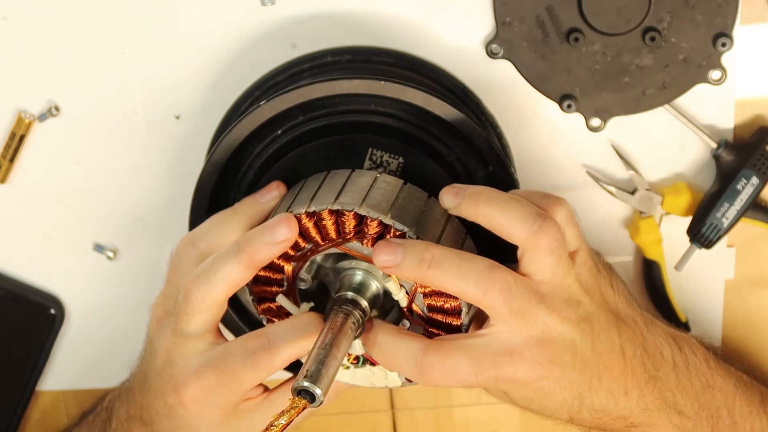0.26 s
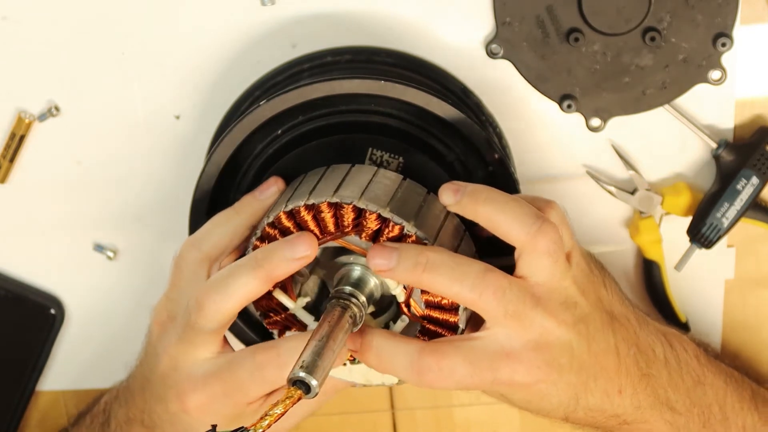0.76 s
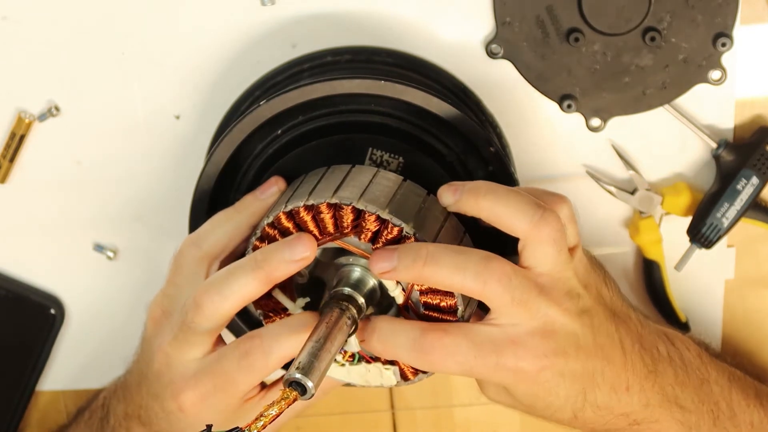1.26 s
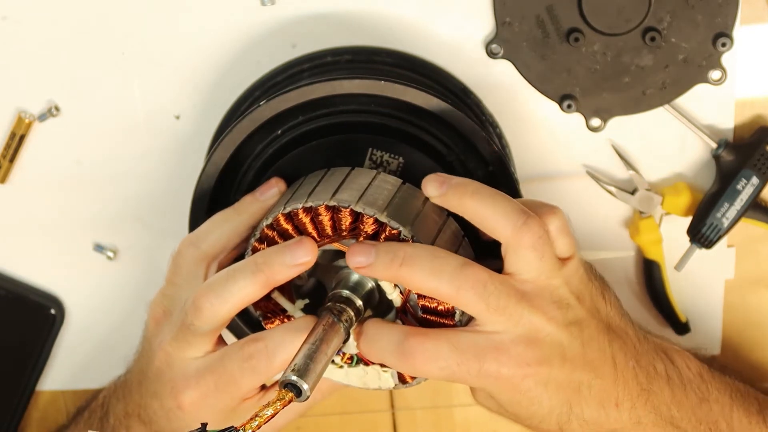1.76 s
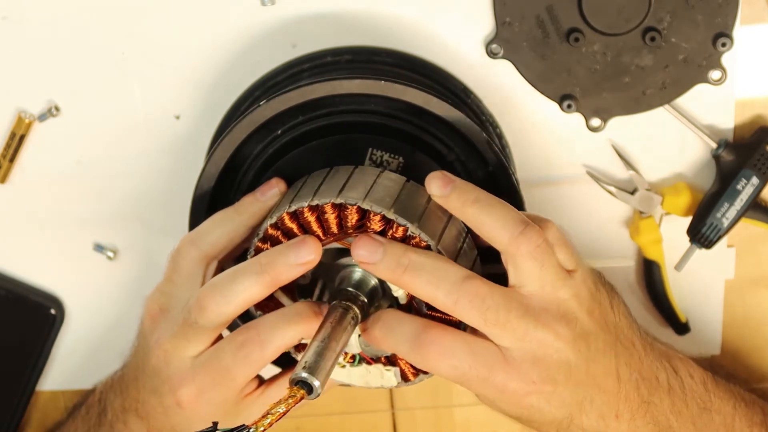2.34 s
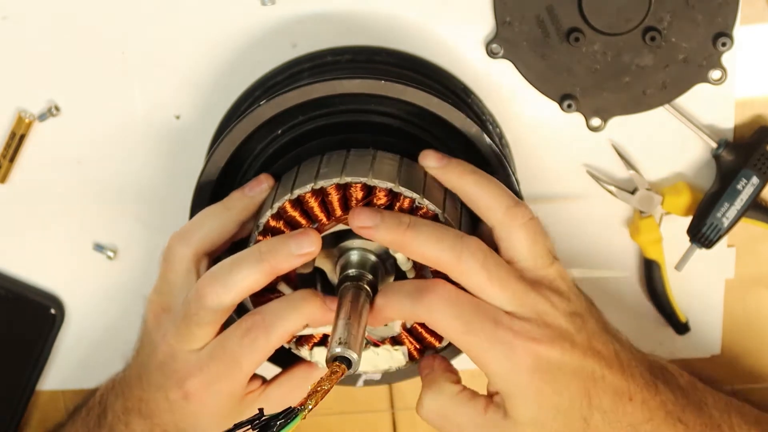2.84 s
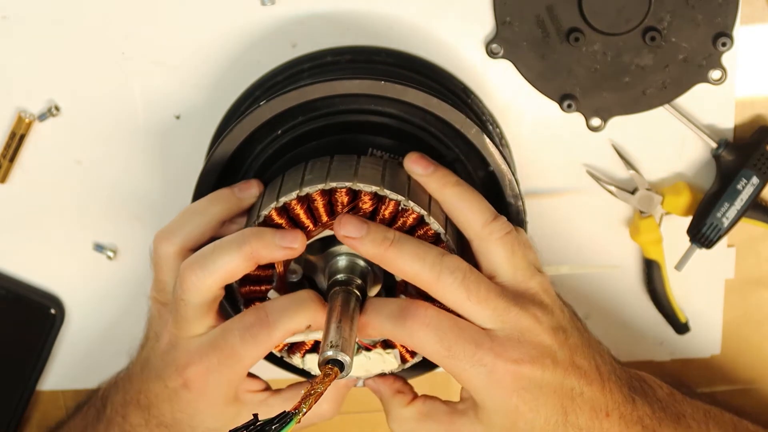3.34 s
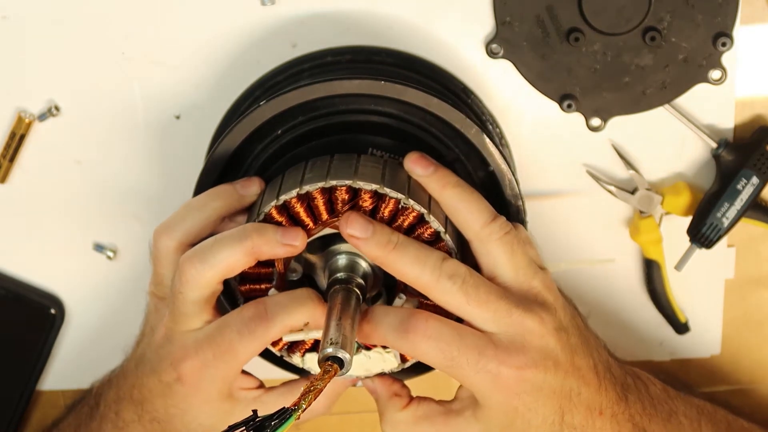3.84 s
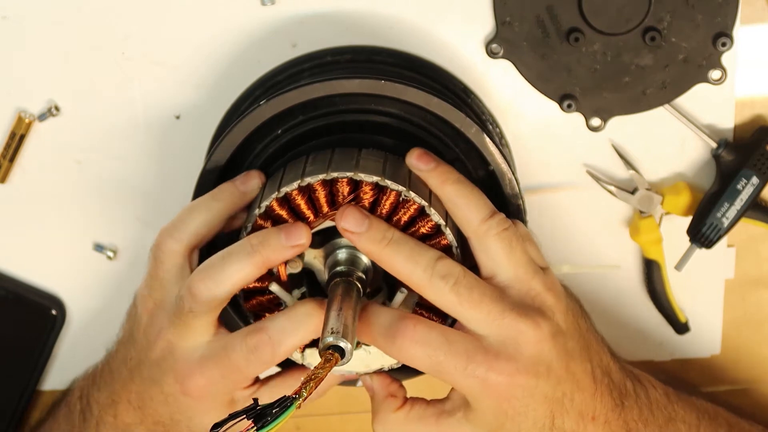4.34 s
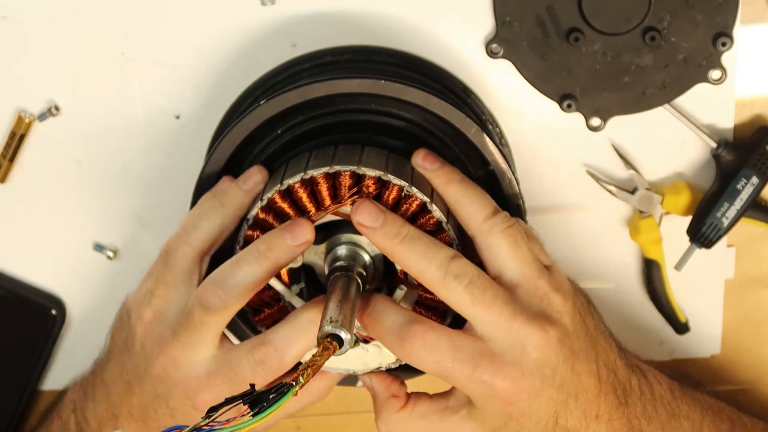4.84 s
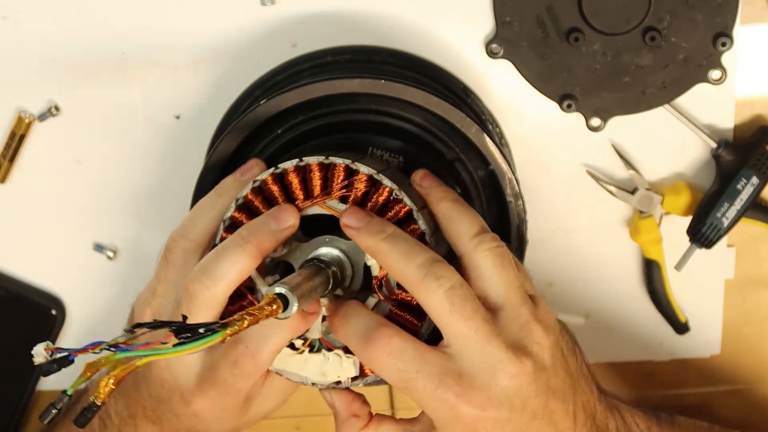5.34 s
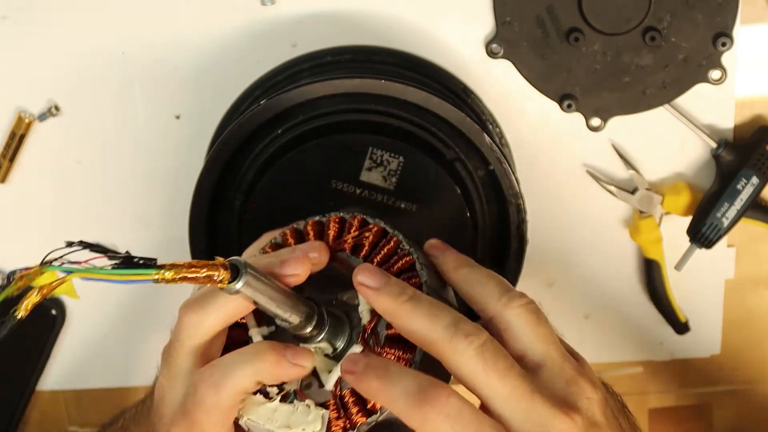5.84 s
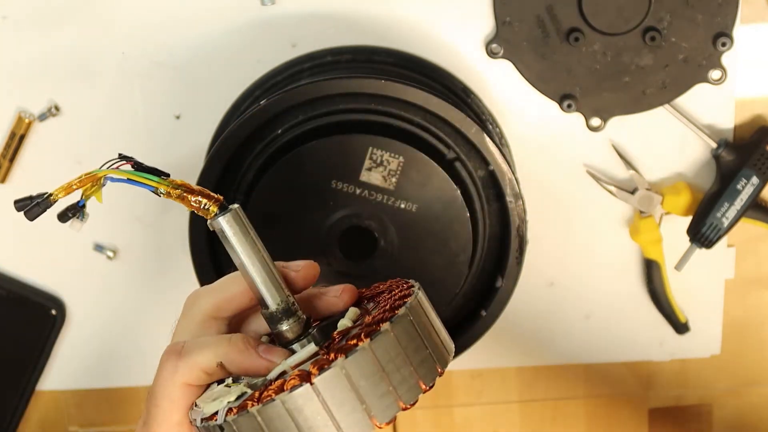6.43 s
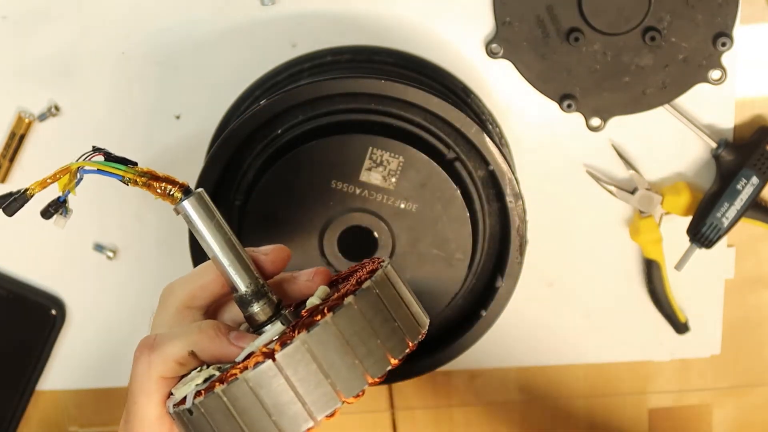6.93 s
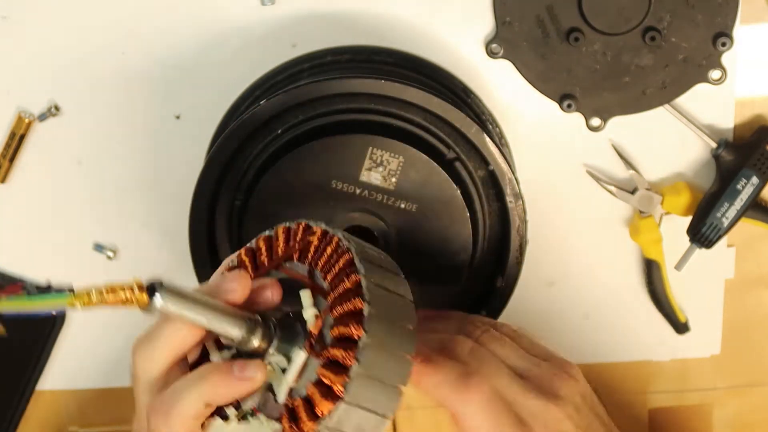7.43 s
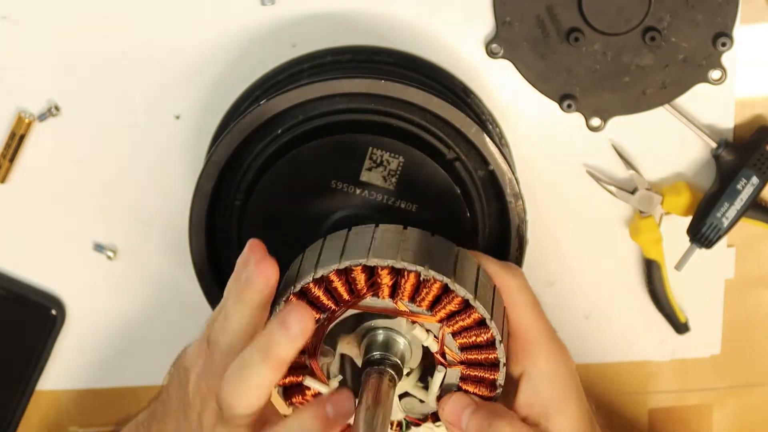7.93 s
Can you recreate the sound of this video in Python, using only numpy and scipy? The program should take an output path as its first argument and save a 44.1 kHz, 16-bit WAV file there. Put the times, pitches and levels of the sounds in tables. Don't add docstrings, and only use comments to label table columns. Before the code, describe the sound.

Close above a hollow workbench, hands work a heavy metal motor core loose. Light clicks and a dull knock come first, then one loud clunk with a brief metallic ring and chatter. Softer thuds and a set-down follow, then connectors clatter with a bright cable rustle. Faint steel tinks end it, over steady ventilation hum and hiss.

```python
import sys
import numpy as np
from scipy import signal
from scipy.fft import rfft, irfft, next_fast_len
from scipy.io import wavfile

SR = 44100
rng = np.random.default_rng(int(sys.argv[2]) if len(sys.argv) > 2 else 0)


def field_ratio(decibels):
    return 10 ** (np.asarray(decibels, dtype=float) / 20)


def dump_mix(stems):
    frames = np.atleast_2d(stems).T
    limited = np.clip(frames, -1, 1)
    pcm = np.round(limited * 32767).astype(np.int16)
    wavfile.write(sys.argv[1], SR, pcm)


N = 360738


def rms_one(x):
    return x / np.sqrt(np.mean(x ** 2) + 1e-20)


def row_norm(x):
    return np.linalg.norm(x, axis=1, keepdims=True)


def at_hz(points, hz):
    table_hz, value = np.array(points).T
    return np.interp(np.log(np.maximum(hz, 1)), np.log(table_hz), value)


def in_time(rows):
    s, db = np.transpose(rows)
    return field_ratio(np.interp(np.arange(N) / SR, s, db, left=-200, right=-200))


def swells(rows, rest_db=-200):
    t = np.arange(0, N + 32, 32) / SR
    slow = field_ratio(rest_db) + sum(field_ratio(db) * np.exp(-((t - s) / half_s) ** 2) for s, db, half_s in rows)
    return np.interp(np.arange(N) / SR, t, slow)


def add(track, s, sound):
    at = round(s * SR)
    track[at:at + len(sound)] += sound[:N - at]


def resonance(x, hz, width_hz):
    r = np.exp(-np.pi * width_hz / SR)
    poles = [1, -2 * r * np.cos(2 * np.pi * hz / SR), r * r]
    return signal.lfilter([(1 - r * r) / 2, 0, (r * r - 1) / 2], poles, x)


def soften(x, contact_ms):
    r = np.exp(-2000 / SR / max(contact_ms, .01))
    return signal.lfilter([(1 - r) ** 2], [1, -2 * r, r * r], x)


def struck(modes, extra_db, ring, rise_ms, spread_db, seconds, sign_bias=.5):
    hz, db, t60 = np.transpose(modes)[:, :, None]
    t = np.arange(int(seconds * SR)) / SR
    strength, side = rng.standard_normal((2, len(modes), 1))
    start = field_ratio(db + extra_db(hz) + spread_db * strength) * np.where(side > -sign_bias, 1, -1)
    decay = field_ratio(-60 * t / (t60 * max(ring, .1)))
    rings = np.sum(start * decay * np.sin(2 * np.pi * hz * t), axis=0)
    return rings * (1 - np.exp(-1000 * t / max(rise_ms, .02)))


def touched(touches, modes, rise_ms):
    out = np.zeros(N)
    for s, db, upper_db, tilt_db, ring in touches:
        def reach(hz):
            treble_db = tilt_db * np.log2(np.maximum(hz / 5000, 1))
            return upper_db * (hz > 1.55 * modes[0][0]) + treble_db
        sound = struck(modes, reach, ring, rise_ms, spread_db=0.9, seconds=0.22)
        add(out, s, field_ratio(db) * sound / np.abs(sound).max())
    return out


# start in s, peak in dB, low modes in dB, middle modes
# in dB, contact in ms.
KNOCKS = [(0.698, -34, 1, 9.5, 0.51), (0.987, -17.5, -2, 3.5, 0.8), (2.621, -22.5, -2, 3, 0.53),
          (2.66, -25.5, -12, 2, 0.3), (2.7045, -13, -3, -5, 0.6), (2.6988, -1, -1.5, 2, 0.57),
          (2.719, -7.5, -13, -18, 0.36), (2.7395, -16, -7, -16, 0.54), (2.762, -17, 8.5, 11, 0.92),
          (2.845, -22, -4, -14, 0.52), (3.31, -20, -8, 8, 1.3), (4.264, -24, -3, 7.5, 1.6),
          (4.405, -31.5, 5.5, 6.5, 1.1), (4.8165, -27, -14, -13, 0.84), (4.829, -27.5, -9, 3, 3.1),
          (4.87, -34, 7, -1, 0.48), (4.948, -24.5, -13, 30, 3), (4.963, -25, -8, 3, 0.41),
          (0.671, -32, 4, 7, 0.37), (0.714, -31, -6, 3, 0.98), (1.72, -46, -17, -2, 0.47),
          (2.198, -48, 15, -4, .7), (2.969, -40, 0, 5, 0.91), (3.091, -42, -14, -7, 0.58),
          (3.352, -31, 1, 8, 0.73), (3.733, -35, 3, -0.5, 0.52), (3.829, -36.5, 9, -6, 0.61),
          (4.058, -39.5, 3, 3, 0.39), (4.099, -37.5, 1, -1, 0.6), (4.55, -42, -5, 4, 0.61),
          (4.691, -36.5, 10, 8, 0.78), (4.893, -38, 6, 0, .6), (4.94, -35, 8, -2, .4),
          (5.059, -40, -2, 3, 0.91), (5.261, -36.5, 2.5, 3, 0.32), (5.381, -44, 1, 1, 0.37)]
MORE_KNOCKS = [
    (0.743, -39, 0, 8, 0.71),
    (0.7, -43, 0, 10, 0.92),
    (1.004, -31.5, -21, -15, .4),
    (3.313, -30, -22, -15, 0.92),
    (3.115, -41, -13, -12, 0.62),
    (2.7, -16, 11, -15, 1.4),
]
# frequency in Hz, level in dB, t60 in s.
BENCH = [(64.4, -7, 0.23), (116.4, -3, 0.3), (147.7, -7, 0.37), (210.5, -13, 0.28), (227.2, -5, 0.21),
         (270, -20, 0.17), (313, -5, 0.25), (363.2, -3, 0.22), (413.5, -6.5, 0.19), (453, -7, 0.24),
         (519.5, -12, 0.38), (566.4, -10.5, 0.21), (601, -13, 0.13), (692, -19, 0.23), (739.6, -22, 0.6),
         (783, -15.5, 0.09), (862, -30, 0.46), (960, -30, 0.23), (1058, -13.5, 0.06)]
# centre in s, level in dB, half length in s.
DRAG = [
    (0.5, -55.5, 0.49),
    (1.72, -55, 0.091),
    (2.3, -54.5, 0.87),
    (2.85, -36, 0.19),
    (3.4, -53, 0.26),
    (4.36, -44, 0.18),
    (4.92, -32.5, 0.09),
    (6.7, -60.5, 1),
]


def bench():
    out = np.zeros(N)
    for s, db, low_db, middle_db, contact_ms in sorted(KNOCKS) + MORE_KNOCKS:
        def place(hz):
            return np.where(hz < 170, low_db, middle_db * (hz < 290))
        ring = 0.42 + 0.0055 * db
        boom = struck(BENCH, place, ring, rise_ms=2.5, spread_db=3.5, seconds=.35, sign_bias=10)
        boom = signal.lfilter(*signal.butter(2, 60, "high", fs=SR), soften(boom, contact_ms))
        add(out, s, field_ratio(db) * boom / np.abs(boom).max())
    slips_per_s = 400
    slips = rng.standard_normal(N) * (rng.random(N) < slips_per_s / SR)
    slips = soften(slips, contact_ms=1.2)
    drag = sum(field_ratio(db) * resonance(slips, hz, 5.5 / t60) for hz, db, t60 in BENCH)
    return out + field_ratio(-9.0) * swells(DRAG, rest_db=-51.5) * rms_one(drag)


# frequency in Hz, level in dB, t60 in s.
HOUSING = [(972, -3, 0.21), (1130, -4, 0.059), (1590, 2.5, 0.033), (1737, 4, 0.046), (1940, 9, 0.016),
           (2314, 9, 0.031), (2340, -12, 0.098), (2530, -1, 0.078), (2405, -6, 0.24), (2800, -7.5, 0.19),
           (2770, -12, 0.1), (3144, -3, 0.1), (3970, -34, 0.18), (4300, -21, 0.14), (4130, -21, 0.16),
           (4700, -20.5, 0.14), (3080, 21, 0.018), (3110, -12, 0.17), (3020, -24, 0.26), (3750, -23, 0.091),
           (2640, -12, 0.2), (3330, -27, 0.2), (3500, -19, 0.035), (4500, -17, 0.11)]


def housing():
    blow = touched([(2.6975, -8.5, 0, 0, 1)], HOUSING, rise_ms=0.77)
    chatter_db, chatter_t60_s, contacts_per_s = -29, 0.62, 900
    t = np.arange(SR // 2) / SR
    contacts = rng.standard_normal(len(t)) * (rng.random(len(t)) < contacts_per_s / SR)
    chatter = contacts * field_ratio(chatter_db - 60 * t / chatter_t60_s)
    return blow + signal.oaconvolve(blow, chatter)[:N]


# start in s, peak in dB, upper modes in dB, treble in dB per octave, ring time factor.
CLINKS = [(.9872, -37, 3, -23, 0.62), (1.7243, -45, 11, 6, 0.6), (2.619, -44.5, -9, -8, 0.43),
          (2.691, -41, -4, -10, 0.39), (2.709, -29, 0, -1, 0.65), (2.737, -30, 0, -18, 0.3),
          (3.057, -45, 1, -17, 0.35), (3.35, -57, -13, -8, 0.37), (3.445, -57, -10, -8, 0.54),
          (3.12, -61, 23, -4, .7), (3.308, -55, -16, -4, 0.66), (3.83, -53, -8, -6, 0.84),
          (4.55, -58, 10, -4, 0.59), (4.8175, -32.5, 2, 13.5, 0.22), (4.826, -38.5, 28, 3, 0.77),
          (4.908, -50, 20, -10, 0.3)]
# frequency in Hz, level in dB, t60 in s.
CORE = [(2445, 10.5, 0.11), (2425, -6, 0.25), (4215, -5, 0.11), (4170, -4, 0.17), (4330, -16, .1),
        (2340, -14, .04), (2560, -12, .04), (4520, -11, 0.07), (4610, -18, 0.085), (7330, -10, 0.095),
        (10040, -14, .04), (10600, -19, .06), (12700, -23, 0.06)]


def core():
    return touched(CLINKS, CORE, rise_ms=.6)


# centre in s, level in dB, half length in s.
BUZZ_LOW = [
    (1.062, -58.5, .045),
    (1.145, -64, 0.018),
    (1.744, -65, .02),
    (2.664, -63, 0.037),
    (2.92, -50, 0.018),
    (4.885, -62, .02),
    (4.935, -64, .015),
    (5.024, -60, 0.025),
]
# centre in s, level in dB, half length in s.
BUZZ_HIGH = [
    (1.02, -64, 0.017),
    (2.68, -61, .012),
    (2.74, -48, 0.02),
    (2.81, -60, 0.018),
    (2.92, -66, .015),
    (4.89, -63, .01),
    (4.975, -64, .015),
    (5.04, -70, .015),
]
# frequency in Hz, width in Hz.
BUZZ_RINGS = [(2440, 100), (4190, 90)]


def buzz():
    contacts_per_s = 500
    contacts = rng.standard_normal((2, N)) * (rng.random((2, N)) < contacts_per_s / SR)
    out = np.zeros(N)
    for rows, grains, (hz, width_hz) in zip((BUZZ_LOW, BUZZ_HIGH), contacts, BUZZ_RINGS):
        ring = resonance(resonance(grains, hz, width_hz), hz, 4 * width_hz)
        out += swells(rows) * rms_one(ring)
    return out


# start in s, peak in dB, upper modes in dB, treble in dB per octave, ring time factor.
TINKS = [
    (2.155, -59, -2, 4, .8),
    (3.735, -61, 17, -14, 0.56),
    (3.821, -53, 8, -12, 0.67),
    (7.6574, -47, 2, 7, 0.9),
    (7.69, -47.5, -3, -3, 1.14),
    (8.07, -54, -39, 35, 0.47),
]
# frequency in Hz, level in dB, t60 in s.
SHAFT = [(4100, -13, 0.089), (4260, -8, 0.2), (4340, -6, .2), (5432, -13, .2), (6230, -7, 0.16),
         (7950, -5.5, 0.27), (10220, -4, 0.14), (12980, -12, .2)]


def shaft():
    return touched(TINKS, SHAFT, rise_ms=.2)


# start in s, peak in dB, upper modes in dB, treble in dB per octave, ring time factor.
PLUG_TAPS = [
    (6.8229, -23.5, -7, 6, 1),
    (6.8623, -20.5, -11, 12, 0.64),
    (6.9462, -16, 10, -2, 0.57),
    (6.975, -20.5, 9, -4, 1),
]
# frequency in Hz, level in dB, t60 in s.
PLUG = [(3690, 3.5, 0.019), (6020, -10, 0.023), (9000, -21, 0.0066), (10280, 1, 0.013), (13050, 6, 0.007),
        (15430, -2, 0.0093), (1860, -0.5, 0.071), (2500, -3, .03), (4340, -11, .02), (410, -14, 0.086),
        (586, -9, 0.037)]


def plug_shells():
    return touched(PLUG_TAPS, PLUG, rise_ms=0.36)


# start
# in s, peak in dB, main resonance in Hz, crack in dB, contact in ms.
CLICKS = [(0.668, -23, 2540, 3, 0.059), (0.7014, -29, 3170, 0, 0.067), (0.951, -34, 3500, 2, 0.09),
          (4.258, -32, 3030, 29, 0.05), (5.799, -27, 1390, 11, 0.13), (6.7985, -22, 1140, 0, 0.055),
          (6.824, -25, 1940, 4, 0.05), (6.863, -25, 1860, 0.5, 0.098), (6.9477, -22, 1860, -4, 0.018),
          (6.9759, -22, 1860, -8, 0.022), (7.0166, -15.5, 3270, 8, 0.081), (7.0934, -23.5, 2650, 3, 0.18),
          (6.829, -26, 1140, 0, 0.065), (6.8758, -29, 1860, 3, 0.038), (6.982, -25.5, 1770, -6, 0.046),
          (7.0225, -43, 3220, 7, .06), (0.7098, -37, 2670, 2, .06), (2.699, -22.5, 1920, 37, 1),
          (7.093, -26, 11460, -12, 0.014), (6.8056, -34, 1140, 6, 0.057), (6.811, -35, 1160, -7, 0.044),
          (6.8356, -30, 2730, -3, .05), (6.849, -35, 1350, -4, .05), (6.868, -34, 1930, -1, .05),
          (6.9518, -30.5, 1860, -12, .04), (6.9895, -33, 3600, -4, .05), (6.8655, -26.5, 1840, -8, 0.076),
          (5.8055, -40, 1350, 1, 0.085), (5.812, -40, 1310, -5, 0.12), (4.266, -40, 2700, -3, .06),
          (7.001, -38, 1800, 3, 0.045), (7.029, -34, 1230, 0, 0.063), (7.054, -35, 2000, -2, 0.066),
          (7.099, -37, 2430, -3, .08), (7.105, -36, 1250, 4, 0.1)]
# start in s, peak in dB, main resonance in Hz, crack in dB.
TICKS = [(0.1307, -45.5, 6600, 8), (.597, -51, 7250, 6), (0.63, -52, 3870, -10), (0.658, -41.5, 6200, -24),
         (1.83, -57, 11000, 15), (2.0905, -46.5, 3580, 4), (2.205, -55, 6800, -2), (2.594, -44.5, 9000, 26),
         (2.701, -54, 10500, -16), (3.732, -48.5, 1000, -22), (3.745, -49.5, 2100, -25),
         (3.821, -58, 12500, 6), (4.05, -53, 2080, -3), (4.55, -48, 4040, -6), (5.099, -56, 12900, -2),
         (5.3975, -43.5, 2480, 4), (5.6342, -45.5, 2570, 4), (5.682, -45.5, 4520, 14),
         (5.885, -45, 3500, 14), (6.2331, -44.5, 2440, 8), (3.058, -51, 2600, -24),
         (7.554, -40.5, 2880, 29), (7.6565, -41.5, 7860, 12), (7.91, -48, 11900, 19),
         (7.918, -52, 5700, -14), (7.372, -53, 2800, -14)]


def clicks():
    direct, feed = np.zeros(N), np.zeros(N)
    t = np.arange(SR // 40) / SR
    bounce_s, tick_contact_cycles = .0016, 0.29
    above = signal.butter(3, 1300, "high", fs=SR, output="sos")
    # parts under the hands, plugs swinging free after 6.5 s, ticks
    parts = [(*click, 2.5 if click[0] < 6.5 else 3.5) for click in CLICKS]
    ticks = [(*tick, 1000 * tick_contact_cycles / tick[2], 7) for tick in TICKS]
    for s, db, hz, crack_db, contact_ms, room_db in parts + ticks:
        contacts = rng.standard_normal((2, len(t))) * np.exp(-(t / 0.0022) ** 2) * [[.4], [.06]]
        contacts[:, 0] = 1
        contacts[0, round(bounce_s * SR)] += 0.8
        body = np.array([resonance(contacts[0], hz, 0.094 * hz), resonance(contacts[1], hz, 0.15 * hz)])
        crack = signal.sosfilt(above, soften(contacts, contact_ms))
        click = body / row_norm(body) + field_ratio(crack_db) * crack / row_norm(crack)
        click *= field_ratio(db) / np.abs(click[0]).max()
        add(direct, s, click[0])
        add(feed, s, field_ratio(room_db) * click[1])
    return direct, feed


# time in s, level in dB.
BRUSH = [
    (6.79, -66),
    (6.83, -51),
    (6.875, -39),
    (6.9, -46),
    (6.94, -50),
    (6.96, -38),
    (7.016, -42),
    (7.132, -71),
    (7.2, -77),
    (7.3, -75),
]


def rustle():
    grains = rng.standard_normal((2, N)) * field_ratio(1.8 * rng.exponential(size=(2, N)))
    above = signal.butter(2, 6000, "high", fs=SR, output="sos")
    grains = signal.sosfilt(above, grains - 0.4 * grains[::-1])
    return field_ratio(-19.5) * in_time(BRUSH) ** 0.53 * rms_one(grains)


# centre in s, level in dB, half length in s.
SLIDES = [
    (.72, -65, 0.037),
    (3.4, -61.5, 0.21),
    (7.35, -64, 0.13),
]


def rub():
    grains = rng.standard_normal((2, N)) * field_ratio(6.4 * np.minimum(rng.exponential(size=N), 4))
    mid, side = resonance(grains, 2950, 1500)
    pair = np.array([mid + 0.21 * side, mid - 0.088 * side])
    return field_ratio(-4.5) * (in_time(BRUSH) + swells(SLIDES)) * rms_one(pair)


# centre in s, level in dB, half length in s.
TREMBLE = [
    (.39, -53, 0.1),
    (.8, -56, 0.055),
    (1.04, -46, 0.056),
    (2.2, -52, 0.069),
    (2.72, -30, 0.058),
    (3.38, -52, 0.17),
    (4.3, -52, 0.32),
    (5.2, -55, 0.32),
    (6.92, -51, 0.19),
    (7.5, -54, 0.069),
]


def tremble():
    deep = resonance(resonance(rng.standard_normal(N), 20, 12), 20, 12)
    return field_ratio(-2) * swells(TREMBLE, rest_db=-59) * rms_one(deep)


# frequency in Hz, t60 in s.
ROOM_T60 = [(100, 0.52), (500, 0.26), (2000, 0.34), (6000, 0.43), (15000, 0.24)]
# frequency in Hz, level in dB.
ROOM_COLOUR = [(100, 1), (400, 3), (1500, -4.5), (4000, -4.5), (9000, -6.5), (15000, -7.5)]
# frequency in Hz, side minus mid in dB.
ROOM_WIDTH = [(60, -63), (150, -59), (380, -20), (950, -17), (2380, -12), (5980, -2), (15000, 8)]


def workshop(x):
    t = np.arange(int(.6 * SR)) / SR
    edges = 60 * 2 ** np.arange(0, 8.6, .5)
    tail, white = np.zeros((2, len(t))), rng.standard_normal((2, 2, len(t)))
    for k, (low, high) in enumerate(zip(edges, np.minimum(edges[1:], .45 * SR))):
        hz = np.sqrt(low * high)
        half_octave = signal.butter(2, [low, high], "band", fs=SR, output="sos")
        band = signal.sosfilt(half_octave, white[k % 2])
        mid_side_db = at_hz(ROOM_COLOUR, hz) + np.array([[0], [at_hz(ROOM_WIDTH, hz)]])
        tail += band * field_ratio(mid_side_db - 60 * t / at_hz(ROOM_T60, hz))
    tail *= field_ratio(-29.0) * (1 - np.exp(-t / 0.00057))
    bench_echo = np.arange(len(t)) == round(.0056 * SR)
    tail[0] += field_ratio(-7.5) * soften(bench_echo, contact_ms=0.13)
    mid, side = signal.oaconvolve(x[None], tail, axes=1)[:, :N]
    return np.array([mid + side, mid - side])


def coloured(db, width):
    size = next_fast_len(N)
    hz = np.arange(size // 2 + 1) * SR / size
    gain = field_ratio([db(hz), db(hz) + at_hz(width, hz)])
    mid, side = irfft(rfft(rng.standard_normal((2, size))) * gain, size)[:, :N]
    return np.array([mid + side, mid - side]) / np.std(mid)


# frequency in Hz, level in dB per Hz.
AIR = [(15, -6), (25, -6), (40, -17.5), (80, -11), (145, -11), (230, -12.5), (480, -14.5), (1290, -22.5),
       (3000, -27), (6100, -34), (12000, -43), (14700, -50), (16500, -64)]
# frequency in Hz, side minus mid in dB.
AIR_WIDTH = [(60, -35), (130, -11), (290, -2), (640, -4.5), (1410, 0.5), (3100, -0.5), (6820, -1),
             (15000, 3.5)]
# frequency in Hz, width in Hz, level in dB.
HUM = [(65, 14.4, 8), (110, 20, 7), (256, 28, 4), (302, 15, -0.5), (403, 18, 5.5), (848, 96, 4.5)]


def air():
    def spectrum(hz):
        hum_db = sum(db / (1 + (2 * (hz - top_hz) / width_hz) ** 2) for top_hz, width_hz, db in HUM)
        return at_hz(AIR, hz) + hum_db
    return field_ratio(-54) * coloured(spectrum, AIR_WIDTH)


def scene():
    wood = bench()
    blow = housing()
    metal = core() + buzz() + shaft()
    plugs = plug_shells()
    direct, feed = clicks()
    near = (wood + metal + blow + plugs + direct) * field_ratio(np.array([[-.15], [.15]]))
    to_room = field_ratio(-10.0) * wood + field_ratio(-4) * metal + field_ratio(-7.0) * blow + field_ratio(-5) * plugs + feed
    return near + workshop(to_room) + rustle() + rub() + tremble() + air()


def band_limit(x):
    return signal.sosfilt(signal.butter(12, 16660, fs=SR, output="sos"), x)


def record(dry):
    level_db = 20 * np.log10(np.abs(dry).max(axis=0) + 1e-6)
    recovery_db = 25 * np.arange(N) / SR
    held_db = np.maximum.accumulate(level_db + recovery_db) - recovery_db
    duck = field_ratio(-.12 * np.maximum(held_db + 23.5, 0))
    duck = signal.lfilter([.004], [1, .004 - 1], duck - 1) + 1
    dry = signal.sosfilt(signal.cheby2(12, 50, 16700, fs=SR, output="sos"), dry)
    return band_limit(1.5 * np.tanh(dry * duck / 1.5))


dry = scene()
out = record(dry)
dump_mix(out)
```